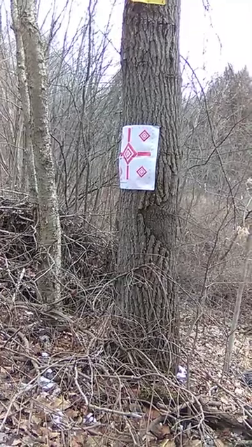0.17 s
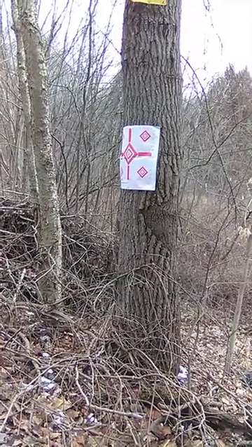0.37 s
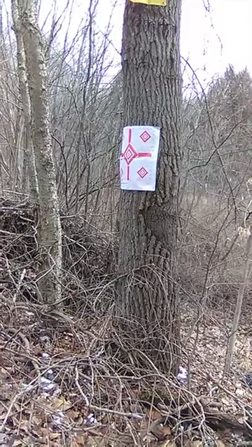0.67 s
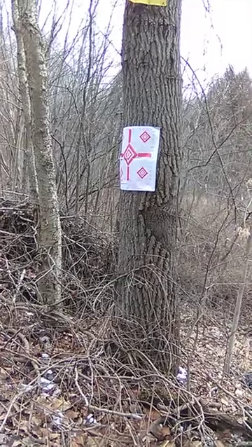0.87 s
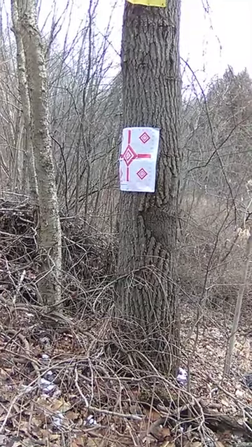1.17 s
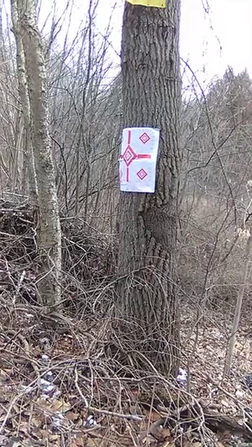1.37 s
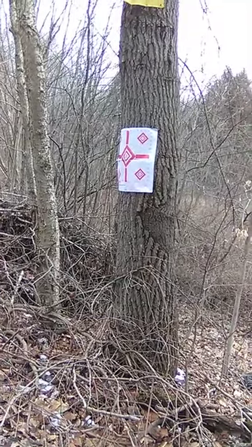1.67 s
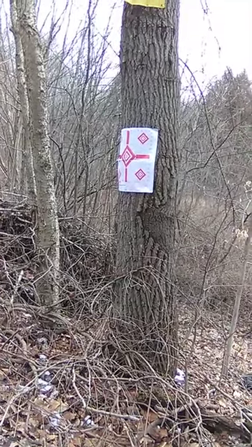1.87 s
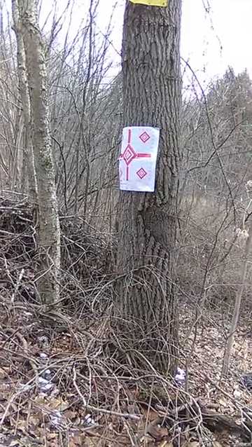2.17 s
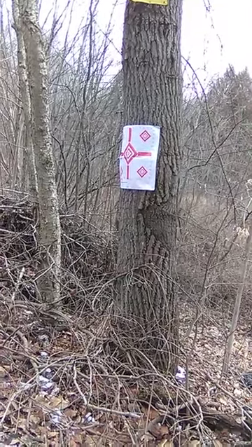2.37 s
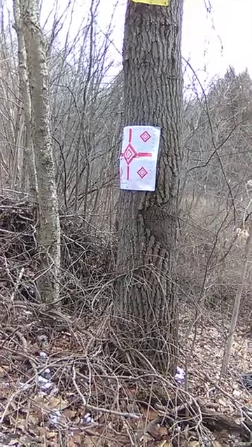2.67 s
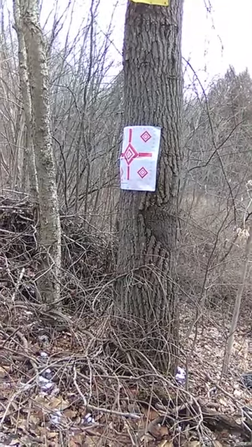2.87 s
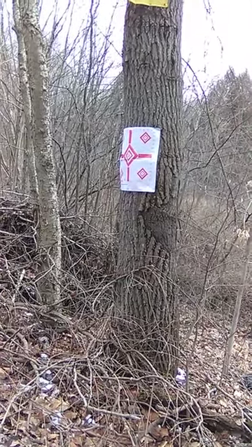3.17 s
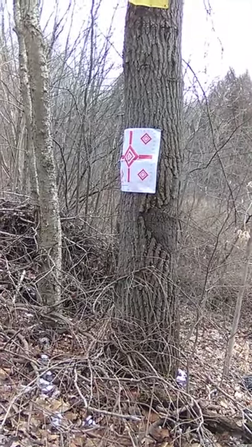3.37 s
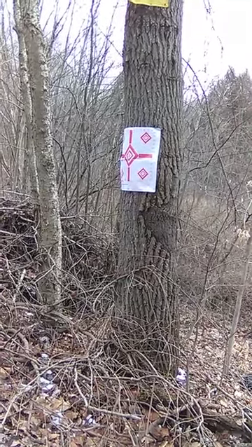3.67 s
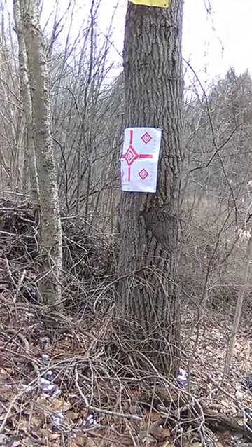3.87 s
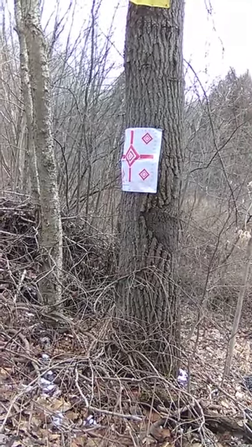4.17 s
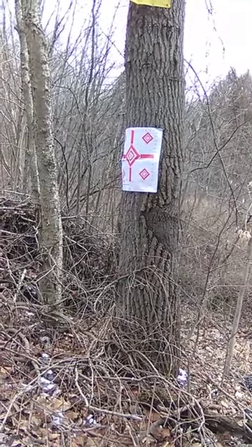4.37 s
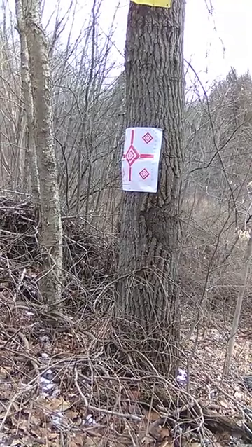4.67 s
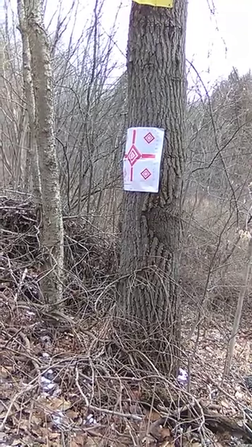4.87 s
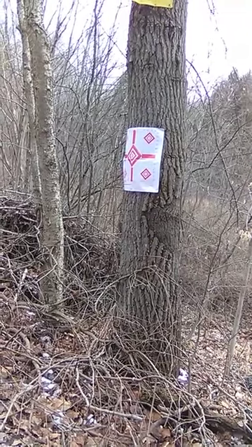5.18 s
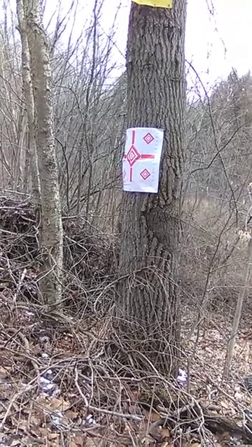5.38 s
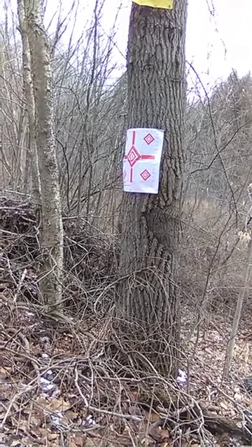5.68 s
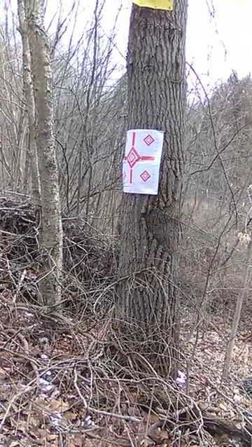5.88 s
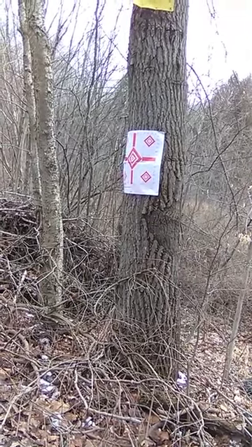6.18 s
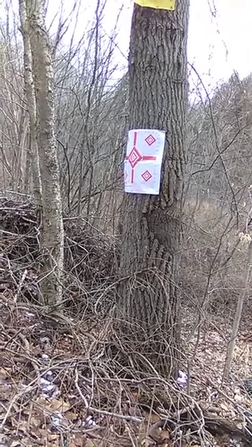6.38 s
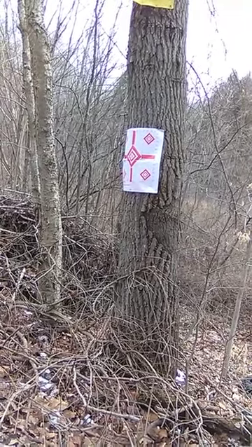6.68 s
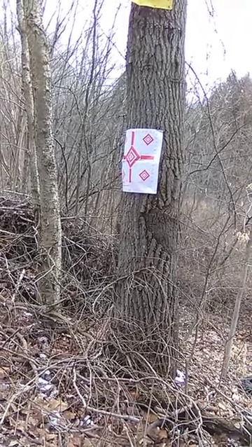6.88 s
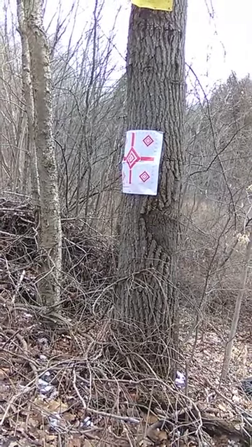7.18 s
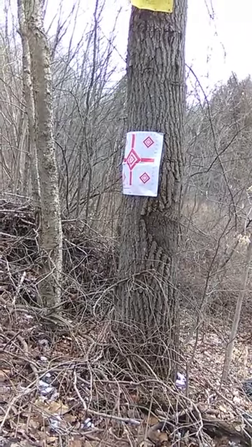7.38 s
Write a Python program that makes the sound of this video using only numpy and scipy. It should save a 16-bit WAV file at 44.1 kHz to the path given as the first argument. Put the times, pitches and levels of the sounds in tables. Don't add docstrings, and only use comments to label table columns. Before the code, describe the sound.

Wind buffets the left side of a close microphone while steel trigger parts click and a gas-powered pistol pops about every three quarters of a second, five times. Pellets slap paper on a tree almost at once, and trunks return a brief hissy echo. A small gas puff escapes after the second shot. After a quieter clicking pause come two final shots, over a faint machine drone and motor whine.

```python
import sys
import numpy as np
from scipy import signal
from scipy.fft import rfft, irfft
from scipy.io import wavfile
from scipy.ndimage import uniform_filter1d

SR = 44100
rng = np.random.default_rng(int(sys.argv[2]) if len(sys.argv) > 2 else 0)


def amplitude_ratio(level_db):
    exponent = np.asarray(level_db, float) / 20
    return 10 ** exponent


def store_wav(level_fs):
    pcm = np.round(np.clip(np.atleast_2d(level_fs), -1, 1) * 32767)
    wavfile.write(sys.argv[1], SR, pcm.T.astype(np.int16))


N = 332514


def evened(x):
    return x / np.sqrt(np.mean(x ** 2) + 1e-20)


def read(points, hz):
    f, value = np.transpose(points)
    return np.interp(np.log(hz + 1), np.log(f + 1), value)


def add(mix, s, sound):
    start = round(s * SR)
    sound = sound[:, max(-start, 0):]
    part = mix[:, max(start, 0):][:, :sound.shape[1]]
    part += sound[:, :part.shape[1]]


def sides(db):
    return amplitude_ratio(np.multiply.outer([.5, -.5], np.atleast_1d(db)))


def noise(size, colour, alike=1):
    # hz, likeness_0_to_1
    likeness = [(130, 0.39), (300, 1), (630, 0.35), (1380, 0.028), (3000, 0.05)]
    hz = np.fft.rfftfreq(size, 1 / SR)
    a, b = rfft(rng.standard_normal((2, size)))
    same = alike * np.clip(read(likeness, hz), 0, 1)
    pair = np.array([a, same * a + np.sqrt(1 - same ** 2) * b])
    return evened(irfft(pair * amplitude_ratio(read(colour, hz)), size))


def resonate(x, hz, width_hz):
    r = np.exp(-np.pi * width_hz / SR)
    return 2 * signal.lfilter([1 - r], [1, -r * np.exp(2j * np.pi * hz / SR)], x).real


def resonate_twice(x, hz, width_hz):
    return resonate(resonate(x, hz, width_hz), hz, width_hz)


def fall(t, rise_s, t60_s):
    u = np.maximum(t, 0)
    return (1 - np.exp(-u / rise_s)) * amplitude_ratio(-60 * u / t60_s)


def ring(t, hz, db, t60_s, rise_s=.0001):
    return amplitude_ratio(db) * fall(t, rise_s, t60_s) * np.sin(2 * np.pi * hz * t)


def slow(rate_hz):
    hz = np.fft.rfftfreq(N, 1 / SR)
    return evened(irfft(rfft(rng.standard_normal((2, N))) / (1 + (hz / rate_hz) ** 2), N))


def gas(size):
    # hz, density_db
    jet_colour = [(530, -15), (900, -5.5), (1080, -8), (2020, -3), (2510, -10), (3390, -5.5), (3770, -4.5),
                  (6400, -8.5), (8950, -5.5), (10500, -12.5), (12400, -17.5), (13500, -17), (14200, -22)]
    # hz, width_hz, level_db
    frame_modes = [(1760, 110, -1), (3756, 260, 4), (5200, 410, 1), (8100, 200, -9), (8540, 200, -10)]
    jet, white = noise(size, jet_colour), rng.standard_normal((2, size))
    frame = sum(amplitude_ratio(db) * resonate(white, hz, width) for hz, width, db in frame_modes)
    return evened(jet + amplitude_ratio(0.5) * evened(frame) * .5)


def shot(db, boom_db):
    # after_blast_s, thump_db, hiss_db, left_right_db
    slugs = [
        (.0006, -29.5, 4, 0),
        (.0082, 2.5, -4, -1),
        (0.0139, 0.5, -5.5, 2.5),
        (0.0193, -14.5, -10.5, 5),
        (.0243, -16.5, -15, -1.5),
    ]
    # hz, level_db, t60_s, left_right_db
    barrel_modes = [(177, -10, 0.024, 2.5), (365, 3, 0.019, 3), (533, -5.5, 0.024, -0.5),
                    (713, 0.5, .016, 1), (1400, -11.5, .02, 4), (1880, -13.5, 0.045, 4.5)]
    # hz, level_db, t60_s
    hammer_modes = [(810, 5, 0.033), (167, -3, 0.023)]
    hammer_s, left_lead_s = .0004, .0002
    chamber_s, chamber_hz, chamber_t60_s = 0.00078, 375, .04
    t = np.arange(SR // 4) / SR - .008
    swell = (t < 0) * amplitude_ratio(np.array([[-6], [-11]])) * np.clip(1 + t / .0055, 0, 1) ** 2
    burst = swell + amplitude_ratio(-8.5) * fall(t, 0.0009, 9) / (1 + (t / .0195) ** 6)
    burst = burst + amplitude_ratio(-17.5) * fall(t, .005, 0.3)
    burst = burst + amplitude_ratio(-19.0) * fall(t - .025, .005, 9) / (1 + (t / .042) ** 6)
    thump = sum(ring(t - hammer_s, *mode, rise_s=0.00042) for mode in hammer_modes)
    thump = thump + ring(t - chamber_s, chamber_hz, boom_db, chamber_t60_s)
    port_lead_s = np.array([[left_lead_s], [0]])
    for s, thump_db, hiss_db, side_db in slugs:
        left, right = fall(t - s, 0.0041, 0.041), fall(t - s + 0.00021, .0002, 0.023)
        burst = burst + amplitude_ratio(hiss_db) * np.array([left, right])
        for hz, ring_db, t60_s, pan_db in barrel_modes:
            mode = ring(t - s + port_lead_s, hz, thump_db + ring_db, t60_s)
            thump = thump + mode * sides(pan_db + side_db)
    return amplitude_ratio(db) * (gas(len(t)) * burst + amplitude_ratio(-6.5) * thump)


def woods(db):
    # hz, density_db
    echo_colour = [(150, -45), (250, -9.5), (381, -2.5), (444, -2.5), (678, -13.5), (750, -13),
                   (1000, -10.5), (1220, -14), (1360, -14), (3490, -8.5), (9150, -12.5), (12000, -16.5),
                   (14200, -27)]
    # hz, t60_s
    decay = [(300, 0.43), (1000, 0.65), (3000, 0.63), (6000, 0.45), (10000, 0.31), (12300, 0.28),
             (14000, 0.17)]
    hz, t, z = signal.stft(noise(SR, echo_colour), SR, nperseg=256)
    t60_s = read(decay, hz)[:, None]
    level = amplitude_ratio(-60 * t / t60_s) + amplitude_ratio(3.0 - 60 * t / (0.9 * t60_s))
    level = level + amplitude_ratio(-13.0 - 60 * t / (2.3 * t60_s))
    z = z * level * amplitude_ratio(0.83 * rng.standard_normal(len(t)))
    for db_rms, bins, frames in [(2.2, 3, 24), (1.5, 14, 4)]:
        patches = uniform_filter1d(uniform_filter1d(rng.standard_normal(z.shape), bins, 1), frames, 2)
        z = z * amplitude_ratio(db_rms * evened(patches))
    lingering = [(690, .6), (1350, .4), (1850, 0.98)]  # hz, gain
    bands = sum(g * np.exp(-((hz[:, None] - f) / 200) ** 2) for f, g in lingering)
    z = z * (1 + np.minimum(t / 0.12, 1) * bands)
    tail = signal.istft(z, SR, nperseg=256)[1][:, :SR]
    return amplitude_ratio(db) * tail * fall(np.arange(SR) / SR, 0.0033, 99)


def fire(mix):
    # start_s, blast_db, chamber_boom_db
    shots = [
        (0.6735, -6.5, -7.5),
        (1.4468, -7, -8.5),
        (2.1807, -7.5, -6.5),
        (2.9566, -7, -11),
        (3.7701, -6.5, -9),
        (6.3497, -7.5, -10),
        (7.1069, -8.5, 7),
    ]
    add(mix, -.07, woods(-38.0))
    for s, db, boom_db in shots:
        add(mix, s - .008, shot(db, boom_db))
        add(mix, s, woods(db - 30.5))


def pellet(db, pan_db, rise_s, bark_db):
    # hz, density_db
    smack_colour = [(290, -46.5), (500, -24.5), (1410, -9), (2030, -5), (3170, -2), (4200, -1), (6300, -6),
                    (8230, -7), (10300, -17), (12300, -21), (14200, -38)]
    # hz, level_db, t60_s
    paper_modes = [(1820, -6, 0.012), (3800, -7, 0.019)]
    t = np.arange(SR // 4) / SR
    crack = 1.6 * fall(t, rise_s, .014) + amplitude_ratio(-9) * fall(t - .007, .0005, .02)
    crack = crack + amplitude_ratio(-11) * fall(t, .002, .085)
    rustle = amplitude_ratio(-21.5) * fall(t, 0.0062, 0.21)
    struck = 0
    for (hz, ring_db, t60_s), extra_db in zip(paper_modes, (bark_db, 0)):
        struck = struck + amplitude_ratio(ring_db + extra_db) * fall(t - rise_s, 0.00023, t60_s) * np.sin(2 * np.pi * hz * t)
    return amplitude_ratio(db) * (noise(len(t), smack_colour) * (crack + rustle) + amplitude_ratio(0.5) * struck) * sides(pan_db)


def hit_paper(mix):
    # start_s, level_db, left_right_db, rise_s, bark_knock_db
    hits = [
        (.7135, -6.5, -2, .0003, 0),
        (1.4905, -12.5, -5, .0005, -5),
        (2.2238, -7.5, -3, 0.00033, 0),
        (2.9995, -8, 0, 0.0019, 3),
        (3.8128, -5.5, 1, .002, 7.5),
        (6.3938, -7.5, 1, 0.0012, 3),
    ]
    for s, *row in hits:
        add(mix, s, pellet(*row))


def click(db, hz, bright_db, t60_s, pan_db, scrape_s, knock_db, steel_db, rattle_db, steel, body_db=-30):
    t, t60_s = np.arange(SR // 4) / SR, np.clip(t60_s, .02, .3)
    luck, white = rng.random((len(steel), 3)), rng.standard_normal((2, len(t)))
    tone = amplitude_ratio(knock_db) * fall(t, 0.00025, 0.012) * np.sin(2 * np.pi * hz * t * (1 - 4 * t))
    for (f, ring_db, ring_t60_s), (phase, pitch, size) in zip(steel, luck):
        wave = np.sin(2 * np.pi * (f * (.975 + .05 * pitch) * t + phase))
        tone = tone + amplitude_ratio(steel_db + ring_db - 8.3 * size) * fall(t, 0.000077, ring_t60_s) * wave
    tone = tone + ring(t, 740, body_db, 0.031, rise_s=0.0013)
    rattle = evened(resonate_twice(white, hz, 1800) + .9 * resonate_twice(white, 3800, 2600))
    rattle = rattle + 0.25 * evened(resonate_twice(white, 1400, 700))
    rattle = evened(np.diff(resonate(rattle, 1500, 3300), prepend=0))
    fizz = evened(resonate(resonate_twice(white[::-1, ::-1], 7000, 5500), 6500, 5500))
    grit = amplitude_ratio(3 * np.clip(evened(uniform_filter1d(white[0, ::-1], 70)), -2, 2) - 1)
    bounce_s = .005 + .006 * luck[0, 2]
    snap = fall(t, 0.0009, 0.12 * t60_s) + amplitude_ratio(-6.5) * fall(t - bounce_s, 0.00058, .2 * t60_s)
    snap = snap + amplitude_ratio(-11) * fall(t, 0.003, t60_s)
    snap = grit * (snap + amplitude_ratio(-13.5) * fall(t - 2 * bounce_s - .004, .0006, 0.14 * t60_s))
    snap = snap + grit * amplitude_ratio(-13.0) * fall(t, .002, 9) / (1 + (t / scrape_s) ** 6)
    linger = amplitude_ratio(-25.5) * fall(t, .005, 3 * t60_s)
    dull = amplitude_ratio(rattle_db) * rattle * (snap + linger)
    bright = amplitude_ratio(bright_db + 4.5) * fizz * (snap * fall(t, .0001, 2.5 * t60_s) + linger)
    return amplitude_ratio(db) * (tone + dull + bright) * sides(pan_db)


def work_trigger(mix):
    # start_s, peak_db, ring_hz
    take_ups = [
        (.3278, -51.5, 1430),
        (.538, -51.5, 2630),
        (1.2245, -57, 3750),
        (2.0302, -48.5, 1590),
        (2.822, -50.5, 3460),
        (3.18, -46, 3800),
        (4.4518, -51, 3515),
        (4.4722, -43.5, 2180),
        (4.698, -57, 3894),
        (6.9679, -46, 3735),
    ]
    cocks = [
        (.5627, -30, 3400),
        (1.3159, -31.5, 3500),
        (2.0513, -29.5, 3330),
        (2.8918, -30.5, 1273),
        (3.7163, -30, 3510),
        (4.5117, -29.5, 1830),
        (7.0445, -30.5, 3350),
    ]
    resets = [
        (.2443, -32.5, 1870),
        (.9067, -30.5, 1880),
        (1.699, -30.5, 3380),
        (2.4289, -31, 1880),
        (3.273, -30.5, 1900),
        (3.4361, -44.5, 1890),
        (6.7321, -30.5, 1940),
        (7.4845, -30, 1840),
    ]
    settles = [
        (4.0375, -29.5, 1820),
        (4.0701, -32, 3400),
        (4.2243, -47.5, 2474),
        (4.28, -59.5, 2410),
        (6.7721, -29, 1400),
    ]
    latches = [
        (3.6385, -20.5, 1760),
        (3.9952, -26, 2950),
    ]
    # hz, level_db, t60_s
    frame_steel = [(1345, -9.5, .025), (1880, -2, .035), (2460, -5.5, .018), (3350, -0.5, 0.014),
                   (3740, -5.5, .022)]
    # bright_db, t60_s, left_right_db, scrape_s
    parts = [(take_ups, (-6, 0.17, 9.7, .005)),
             (cocks, (-14, 0.14, 2.5, .024)),
             (resets, (-16, 0.12, 3.2, .011)),
             (settles, (-21.5, 0.12, 1, .007)),
             (latches, (-10, 0.11, 5, .007))]
    for rows, voice in parts:
        for s, db, hz in rows:
            add(mix, s, click(db, hz, *voice, knock_db=-7.5, steel_db=-4, rattle_db=-7.0, steel=frame_steel))


def release_sear(mix):
    # start_s, peak_db, bright_db, left_right_db
    releases = [
        (.665, -26, -21, 7.5),
        (1.4269, -17.5, -20.5, 6),
        (2.17, -16, -22, 6.5),
        (2.553, -47, -11, 8),
        (2.9345, -18, -25.5, 9),
        (3.752, -15, -22.5, 5.5),
        (4.7594, -19.5, -22.5, 4),
        (7.084, -18, -29.5, 8),
    ]
    # hz, level_db, t60_s
    sear_steel = [(1025, -5, .02), (1750, -6, .022), (2950, -3, .014), (3500, -10, 0.028),
                  (4600, -18, 0.011)]
    sear_hz, sear_t60_s, scrape_s = 1600, 0.093, .004
    for s, db, bright_db, pan_db in releases:
        add(mix, s, click(db, sear_hz, bright_db, sear_t60_s, pan_db, scrape_s, knock_db=0.5, steel_db=-5,
                          rattle_db=-11.5, steel=sear_steel, body_db=-13.5))


def bump(db, hz, t60_s):
    t = np.arange(SR // 10) / SR
    white = rng.standard_normal(len(t))
    return amplitude_ratio(db) * evened(resonate(resonate(white, hz, 480), hz, 450)) * fall(t, 0.0011, t60_s) * sides(2.0)


def handle_grip(mix):
    # start_s, level_db, pitch_hz, t60_s
    knocks = [
        (1.802, -23, 680, 0.03),
        (1.8033, -34, 1600, 0.026),
        (2.548, -35.5, 777, .039),
        (4.0712, -46, 1040, 0.05),
        (6.773, -47, 720, 0.036),
    ]
    for s, *row in knocks:
        add(mix, s, bump(*row))


def puff(db, length_s):
    # hz, density_db
    leak_colour = [(400, -3), (900, -29), (1600, -7), (2300, -14.5), (3200, 1), (4300, -7), (5600, -1.5),
                   (8500, -14.5), (14200, -30)]
    t = np.arange(SR // 4) / SR
    sputter = amplitude_ratio(0.82 * evened(uniform_filter1d(rng.standard_normal(len(t)), 60)))
    leak = noise(len(t), leak_colour)
    seep = amplitude_ratio(db - 26.0) * evened(np.diff(leak, n=2, prepend=0, append=0)) * fall(t, .03, .35)
    flow = 1.03 * fall(t, 0.00027, .3) + .7 * fall(t - .013, 0.00051, 0.1)
    shut = amplitude_ratio(-60 * np.maximum(t - length_s, 0) / 0.074)
    valve = ring(t, 1880, db - 29.0, .28, rise_s=.01) * sides(3.0)
    return seep + amplitude_ratio(db) * leak * sputter * flow * shut * sides(0.89) + valve


def leak_gas(mix):
    start_s = 1.8015
    add(mix, start_s, puff(-22, .03))
    add(mix, start_s, woods(-49.5))


def slap(db):
    swing_hz = 154
    u = (np.arange(SR // 20) / SR - .006) * swing_hz
    soft = np.hypot(u, .07) - .07
    swing = np.cos(2 * np.pi * u) * np.exp(-np.where(u < 0, 5, 2.2) * soft)
    return amplitude_ratio(db - 1.5) * swing * amplitude_ratio(np.array([[0], [-22]]))


def buffets():
    # crest_s, peak_db
    pushes = [(0.117, -16.5), (0.333, -20), (0.72, -18), (0.751, -14), (0.761, -11), (0.806, -7.5),
              (0.818, -16.0), (1.374, -10.5), (1.565, -15), (1.83, -27), (1.847, -20), (2.027, -16),
              (2.669, -9), (2.945, -9.5), (3.212, -11.5), (3.431, -20), (3.442, -18), (3.506, -18),
              (3.53, -13), (3.557, -10)]
    # crest_s, peak_db
    tugs = [(0.151, -16), (0.162, -19), (0.284, -15), (0.456, -16), (0.669, -8), (0.734, -14.5),
            (0.791, -11), (0.862, -13.5), (0.875, -12.5), (0.984, -18), (1.005, -12.5), (1.075, -12.5),
            (1.26, -7.0), (1.341, -15.5), (1.355, -17), (1.401, -7.5), (1.548, -3.5), (1.871, -18),
            (1.882, -15), (1.968, -9.5), (1.995, -12.5), (2.013, -9), (2.262, -9.5), (2.57, -19.5),
            (2.652, -17.5), (2.681, -16.0), (2.703, -10), (2.859, -13), (2.876, -24), (2.889, -11.5),
            (2.921, -18), (3.004, -22), (3.04, -13.0), (3.468, -15), (3.76, -15.5), (3.859, -21),
            (3.88, -15), (3.911, -9)]
    mix = np.zeros((2, N))
    for s, db in pushes:
        add(mix, s - .006, slap(db))
    for s, db in tugs:
        add(mix, s - .006, -slap(db))
    return mix


def gusts(rows, calm_db):
    swell_db_per_s, ease_db_per_s, flap_slope = 400, 281.5, 0.38
    t = np.arange(0, N / SR + .01, .002)
    s, hold_s, db = np.transpose(rows)[:, :, None]
    shape = db - swell_db_per_s * np.maximum(s - t, 0) - ease_db_per_s * np.maximum(t - s - abs(hold_s), 0)
    power = amplitude_ratio(shape) ** 2
    level_db = 10 * np.log10(power.sum(0) + amplitude_ratio(calm_db) ** 2)
    flutter_db = flap_slope * (level_db + 20)
    return [np.interp(np.arange(N) / SR, t, v) for v in (level_db, flutter_db)]


def wind():
    # start_s, hold_s, level_db
    left_gusts = [(0.04, 0.0047, -14.5), (0.136, 0.036, -15), (0.236, 0.019, -19.5), (0.326, 0.0089, -13.5),
                  (0.388, 0.01, -16), (0.45, 0.043, -19), (0.55, 0.025, -27.5), (0.734, 0.011, -8.5),
                  (0.82, 0.025, -13), (0.946, 0.015, -12.5), (0.992, 0.082, -17.5), (1.15, 0.021, -17),
                  (1.216, 0.042, -13), (1.362, 0.042, -12), (1.558, 0.007, -15), (1.664, 0.017, -25),
                  (1.74, 0.027, -31), (1.846, 0.0057, -8), (1.92, 0.018, -15.5), (1.98, 0.095, -19.5),
                  (2.186, 0.014, -30), (2.266, 0.0094, -23.5), (2.332, 0.031, -19.5), (2.43, 0.042, -19.5),
                  (2.512, 0.042, -19), (2.564, 0.016, -18.5), (2.622, 0.08, -16), (2.82, 0.035, -23.5),
                  (2.888, 0.0073, -12.5), (2.99, 0.017, -12.5), (3.1, 0.044, -22.5), (3.228, 0.0055, -17),
                  (3.412, 0.017, -16.5), (3.528, 0.019, -18), (3.662, 0.0086, -19), (3.728, 0.016, -19),
                  (3.868, 0.0076, -12), (3.92, 0.014, -15.5), (4.01, 0.048, -20.5), (4.108, 0.014, -18.0),
                  (4.228, 0.013, -29), (4.35, 0.03, -42), (4.51, 0.028, -46.5), (4.904, 0.016, -33.5),
                  (4.976, 0.01, -39.5), (5.034, 0.033, -43.5), (5.254, 0.014, -24.5), (5.32, 0.048, -28.0),
                  (5.47, 0.03, -36), (5.55, 0.03, -41.5), (5.652, 0.018, -39), (5.836, 0.016, -38),
                  (6.054, 0.024, -43.0), (6.13, 0.02, -43.5), (6.246, 0.012, -48), (6.368, 0.009, -38.5),
                  (6.504, 0.012, -39), (6.814, 0.026, -47.5), (7.124, 0.0068, -33), (7.322, 0.013, -45.0)]
    # start_s, hold_s, level_db
    right_gusts = [(0, 0.16, -49), (.3, 0.18, -35.5), (.62, 0.24, -25), (1.0, 0.36, -35.5),
                   (1.4, 0.31, -28), (1.7, 0.2, -32.5), (2.55, 0.22, -36.5), (2.95, 0.11, -27),
                   (3.28, 0.27, -33), (3.56, 0.047, -29.5), (3.8, 0.043, -47), (4.1, 0.2, -36.5),
                   (4.55, 0.051, -39.5), (4.7, 0.023, -36.5), (4.92, 0.092, -42.5), (6.05, 0.043, -55.5),
                   (6.15, 0.038, -37.5), (6.75, .08, -55.5), (7.42, 0.13, -48.5)]
    # hz, density_db
    lump_colour = [(15, -42), (30, -20.5), (50, 6), (75, 5.5), (110, -1), (160, -10), (220, -21),
                   (400, -77.5)]
    # hz, density_db
    flap_colour = [(100, -29), (200, 4.5), (300, -5), (450, -18.5), (700, -27.5), (1200, -52.5),
                   (2500, -88.5)]
    flap_db = np.array([[-20], [-10.5]])
    lump_top, flap_top = 1.5, 1.8
    level_db, flutter_db = np.stack([gusts(left_gusts, -67), gusts(right_gusts, -63.5)], axis=1)
    lumps = noise(N, lump_colour, alike=.1)
    lumpy = lump_top * np.tanh(slow(49) / lump_top)
    lumps = evened(lumps / (uniform_filter1d(lumps ** 2, 3500) + .05) ** 0.38 * amplitude_ratio(1.9 * lumpy))
    crests = .6 + np.clip(lumps, 0, flap_top) ** 1.5
    flaps = evened(noise(N, flap_colour, alike=.2) * crests * amplitude_ratio(3 * slow(25)))
    return amplitude_ratio(level_db) * (lumps + amplitude_ratio(flap_db + flutter_db) * flaps)


def focus():
    # hz, level_db
    motor_lines = [(6000, -90), (7000, -83), (8000, -71.5), (10000, -78), (11000, -95), (12000, -87),
                   (14000, -71.5)]
    # start_s, end_s, level_db
    runs = [(0, .1, 0), (.39, .665, 0), (1.03, 1.06, -3), (1.34, 1.38, 0), (1.99, 2.03, -3),
            (2.63, 2.67, -1), (2.83, 3.3, -1), (3.58, 3.63, -2), (4.23, 5.275, 0), (5.51, 5.54, -1),
            (5.83, 5.87, -2), (6.15, 6.18, -2)]
    t = np.arange(N) / SR
    on = uniform_filter1d(sum(amplitude_ratio(db) * (t > a) * (t < b) for a, b, db in runs), 400)
    flicker = slow(25)
    lines = 0
    for k, (hz, db) in enumerate(motor_lines):
        level = amplitude_ratio(db + 2.6 * np.roll(flicker[0], 9000 * k))
        lines = lines + level * np.cos(2 * np.pi * (hz * t + rng.random()))
    hiss = evened(resonate_twice(rng.standard_normal(N), 8200, 2600))
    whirr = evened(resonate_twice(rng.standard_normal(N), 11000, 6000))
    coast = signal.lfilter([1 / 2500], [1, 1 / 2500 - 1], on)
    turning = np.maximum(on, coast)
    motor = on * lines + turning * amplitude_ratio(-80.5) * whirr
    motor = motor + (turning + .2 * amplitude_ratio(3.0 * slow(8)[0])) * amplitude_ratio(-78.5) * hiss
    return motor * amplitude_ratio(np.array([[-18], [3]]))


def air():
    # hz, density_db
    air_colour = [(120, -32.5), (200, -3), (443, -12), (570, -11.5), (659, -1.5), (734, -6), (998, -11.5),
                  (1240, -19.5), (1980, -21), (2600, -30), (4600, -38), (5760, -37), (8260, -25),
                  (13700, -38.5), (15000, -50.5)]
    # hz, density_db
    rumble_colour = [(15, -5.5), (35, 0.5), (55, 0), (80, -14.5), (130, -43)]
    # hz, width_hz, level_db
    drone_bands = [(510, 24, -84), (666, 20, -74), (980, 22, -87)]
    white = rng.standard_normal(N)
    drone = sum(amplitude_ratio(db) * evened(resonate_twice(white, hz, width)) for hz, width, db in drone_bands)
    drone = drone * amplitude_ratio(3.2 * slow(9)[0])
    still = amplitude_ratio(-68 + 1.2 * slow(3) + 0.68 * slow(15)) * noise(N, air_colour)
    rumble = amplitude_ratio(-62.5 + 2.5 * slow(4.4)) * noise(N, rumble_colour, alike=.2)
    return still + drone + rumble


def scene():
    # hz, left_right_db
    port_shade = [(100, -4), (370, -0.5), (1270, 3.5), (2330, 6), (4300, 1), (8000, -5), (9500, -9.5),
                  (12000, 0), (14600, 3)]
    gun = np.zeros((2, N))
    fire(gun)
    hit_paper(gun)
    work_trigger(gun)
    release_sear(gun)
    handle_grip(gun)
    leak_gas(gun)
    ports = sides(read(port_shade, np.fft.rfftfreq(N, 1 / SR)))
    return irfft(rfft(gun + air()) * ports, N) + buffets() + wind() + focus()


def starve(x):
    band_bins, weak_db, luck_db = 8, -10, 4.5
    hz, _, z = signal.stft(x, SR, nperseg=2048)
    power = (abs(z[:, :1024]) ** 2).sum(0).reshape(-1, band_bins, z.shape[2]).sum(1)
    centre_hz = hz[:1024].reshape(-1, band_bins).mean(1)
    inside = (centre_hz > 1500) & (centre_hz < 13900)
    band_db, total = 10 * np.log10(power + 1e-20), power[inside].sum(0)
    luck = evened(uniform_filter1d(rng.standard_normal(power.shape), size=2, axis=1))
    weak = band_db - band_db[inside].mean(0) + luck_db * luck < weak_db
    weak &= inside[:, None] & (total < 2 * np.roll(total, 2))
    keep = np.vstack([np.repeat(~weak, band_bins, axis=0), np.ones((1, z.shape[2]))])
    return signal.istft(z * keep, SR, nperseg=2048)[1][:, :N]


def band_limit(x):
    return signal.sosfilt(signal.butter(12, 15160, fs=SR, output="sos"), x)


def record(dry):
    x = signal.sosfilt(signal.butter(2, 38, "high", fs=SR, output="sos"), dry)
    x = np.clip(x, -1.08, 1.08)
    x = signal.oaconvolve(x, signal.firwin(255, 14350, window=("kaiser", 7), fs=SR)[None], "same")
    x = np.clip(starve(x), -1, 1)
    return band_limit(x)


dry = scene()
out = record(dry)
store_wav(out)
```